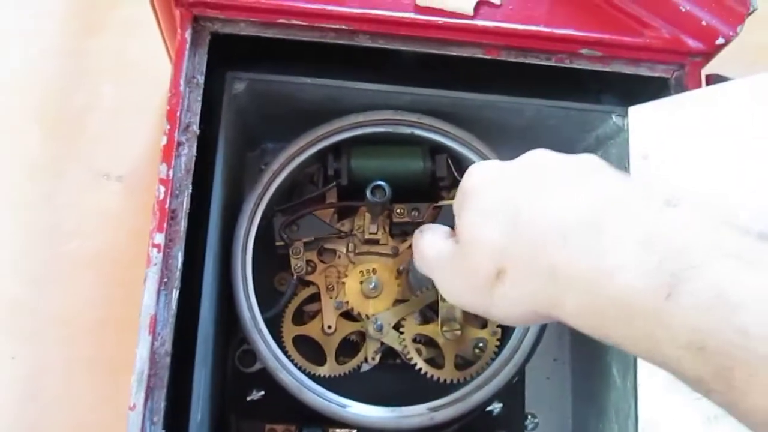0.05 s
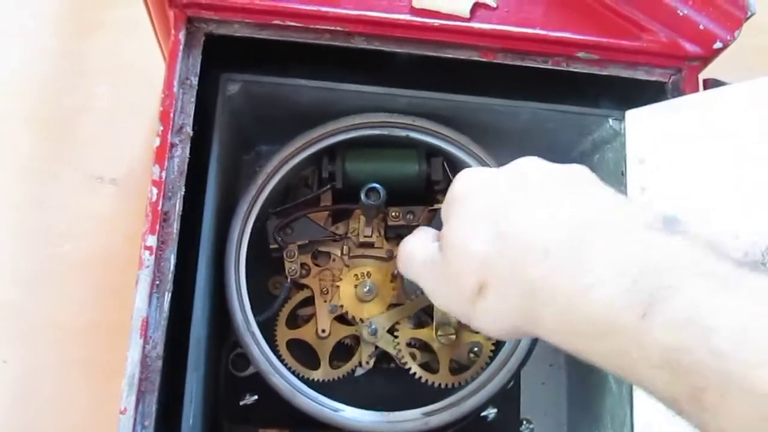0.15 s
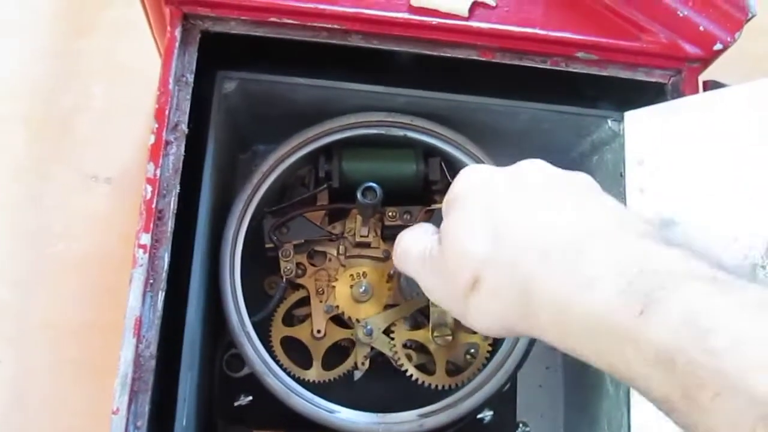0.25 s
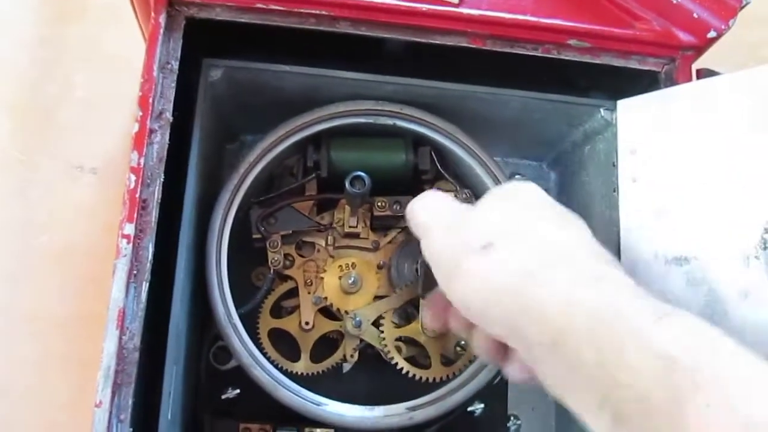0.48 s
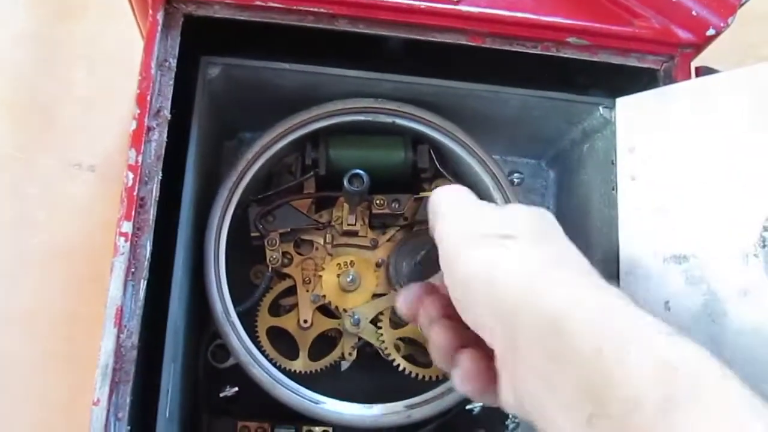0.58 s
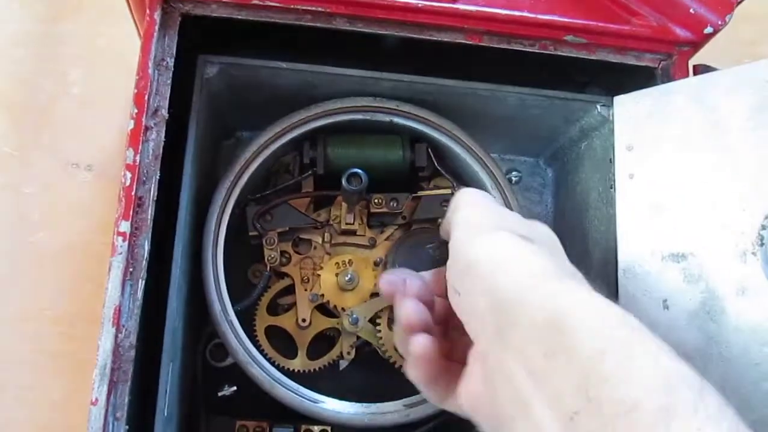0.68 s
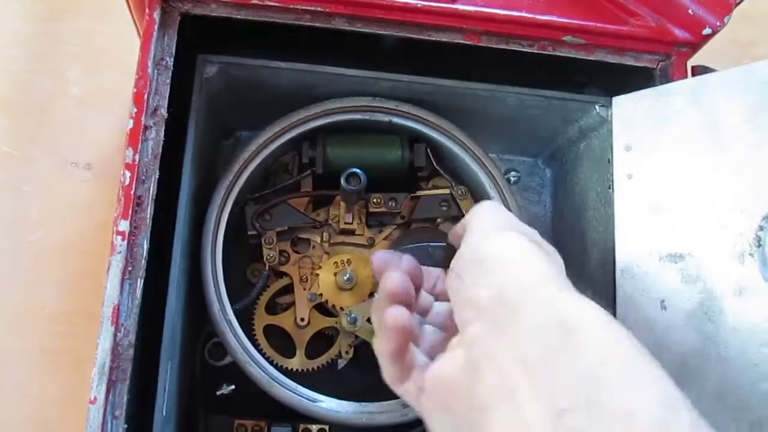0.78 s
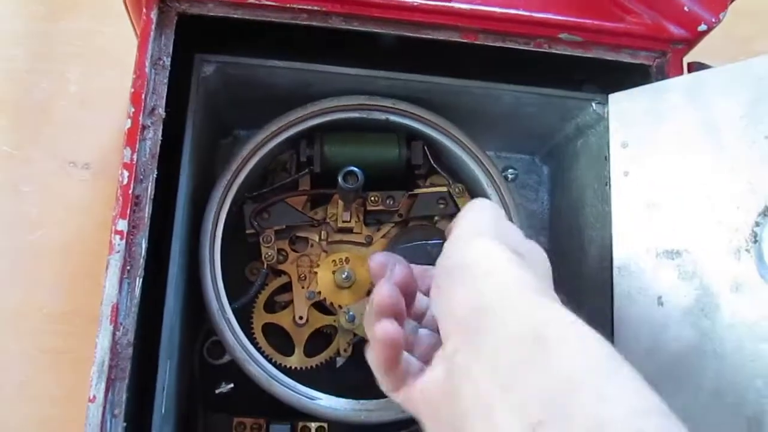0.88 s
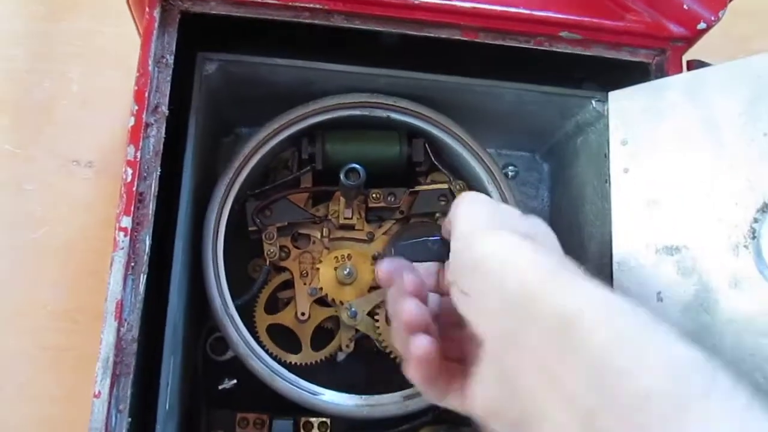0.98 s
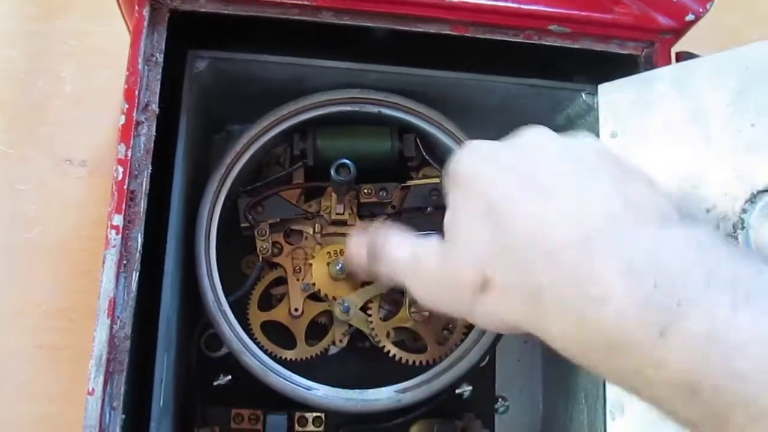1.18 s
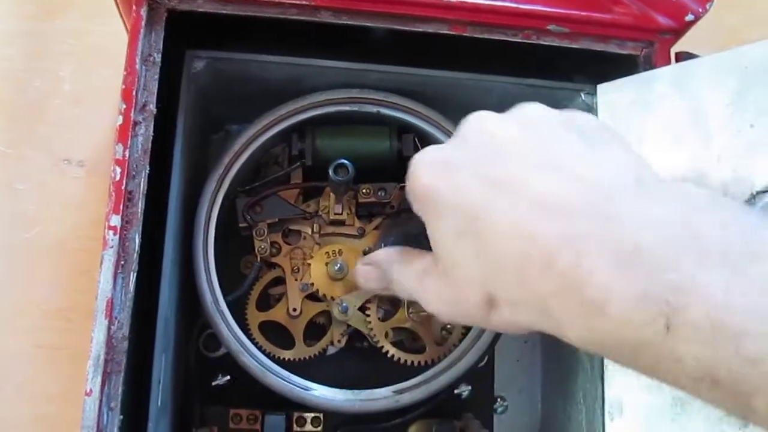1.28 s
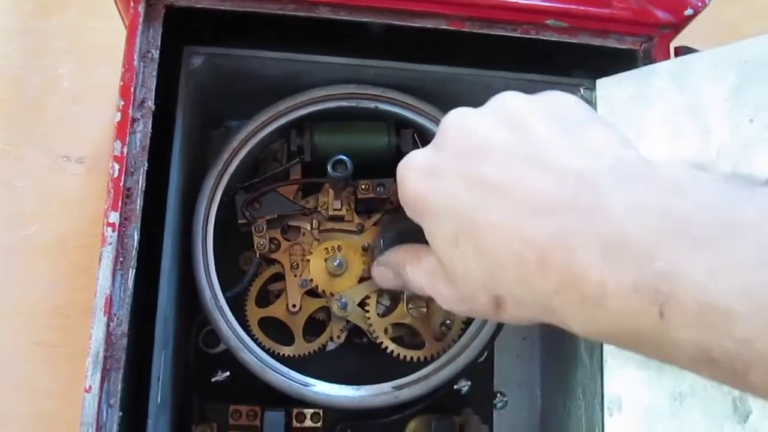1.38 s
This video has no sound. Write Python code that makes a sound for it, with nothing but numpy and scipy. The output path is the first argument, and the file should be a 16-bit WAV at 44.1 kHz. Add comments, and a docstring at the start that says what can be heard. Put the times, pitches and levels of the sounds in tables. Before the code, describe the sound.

A clockwork mechanism is wound by hand, close up in a small room. The key knocks, ten quick sharp ratchet clicks follow, then the key rattles, a steel part rings faintly and the metal case settles with dull bumps.

```python
"""A small room, a stereo microphone close to a clockwork movement in a metal case, wound by hand.
The key takes up its slack, the pawl snaps over ten ratchet teeth, then the spring falls back on it.
The key rattles as the hand lets go, a small steel part rings on and the box settles with dull bumps.
Each blow is a burst of noise plus the dying modes of the parts it strikes.
Behind it are the room's short reverberation, soft air and a faint hum."""
import sys
import numpy as np
from scipy import signal
from scipy.fft import rfft, irfft
from scipy.io import wavfile
from scipy.ndimage import uniform_filter1d

SR = 44100
rng = np.random.default_rng(int(sys.argv[2]) if len(sys.argv) > 2 else 0)


def file_out(sig):
    """Save sig as 16-bit WAV at sys.argv[1]."""
    # one column per channel
    cols = np.atleast_2d(sig).T
    # limit, then scale
    lim = np.clip(cols, -1, 1)
    pcm = np.round(lim * 32767).astype(np.int16)
    wavfile.write(sys.argv[1], SR, pcm)


N = 63945
T = np.arange(N) / SR
HZ = np.fft.rfftfreq(N, 1 / SR)
# At the microphone: left-right likeness of close noise, lag of the right side, lean to the left
NEAR_ALIKE, RIGHT_LAG_S, BODY_PAN_DB = 0.81, 0.000016, 1
STEEL_RISE_S = 0.00023


def amp(db):
    """Decibels to gain."""
    return 10 ** (np.asarray(db) / 20)


def unit(x):
    """Scales to rms 1."""
    return x / np.sqrt(np.mean(x ** 2) + 1e-20)


def read(points, hz):
    """Reads a table on a log-frequency axis."""
    f, value = np.transpose(points)
    return np.interp(np.log(hz + 1), np.log(f), value)


def pan(db):
    """Left and right gains, the left louder by db."""
    return amp([[db / 2], [-db / 2]])


def add(mix, s, sound):
    """Mixes a sound in at s seconds."""
    part = mix[:, round(s * SR):]
    part += sound[..., :part.shape[1]]


def strike(rise_s, t60_s):
    """Envelope of a blow: quick rise, exponential decay."""
    return (1 - np.exp(-T / rise_s)) * np.exp(-np.minimum(np.log(1000) * T / t60_s, 100))


def blend(a, b, alike):
    """Mixes two noises so that the result has a given likeness (0-1) to a."""
    alike = np.clip(alike, 0, 1)
    return alike * a + np.sqrt(1 - alike ** 2) * b


def noise(colour, alike, tilt_db=0, draws=2):
    """Stereo noise at rms 1 from the first two draws, with a colour, likeness and tilt per octave."""
    a, b = rfft(rng.standard_normal((draws, N))[:2])
    gain = amp(read(colour, HZ) + tilt_db * np.log2(np.maximum(HZ, 200)))
    return unit(irfft(np.array([a, blend(a, b, alike)]) * gain, N))


def mode(hz, db, t60_s, rise_s, detune=0):
    """One dying mode; the contact point shifts its pitch a little."""
    hz = hz * (1 + detune * rng.standard_normal())
    arrival = T - RIGHT_LAG_S * np.arange(2)[:, None]
    return amp(db) * strike(rise_s, t60_s) * np.sin(2 * np.pi * (hz * arrival + rng.random()))


def ring(modes, rise_s, detune=0.004):
    """All modes of one struck part."""
    return sum(mode(hz, db, t60, rise_s, detune) for hz, db, t60 in modes)


# Colour of the air in the room: f/Hz, relative level/dB
AIR_COLOUR = [(15, -62), (25, -39), (44, -11), (82, -19), (301, -9), (416, -5.5), (607, -10.5), (840, -5.5),
              (936, -12), (1230, -8.5), (1400, -11.5), (2840, -17.5), (8140, -33), (11300, -44.5),
              (16000, -61)]
# The air across the microphone: f/Hz, left-right likeness/0-1
AIR_ALIKE = [(40, 0.48), (200, 0.91), (800, 0.91), (2500, 0.17), (8000, 0.1)]
# Tones of the background hum: f/Hz, relative level/dB
HUM_TONES = [(59.2, -71), (376.8, -62.5), (414.5, -59.5), (559.9, -61), (845.2, -63.5)]
def room_tone(air_db=-49, hum_db=-1, waver_rad=0.26):
    """All around the microphone: soft steady air with a faint wavering hum."""
    hum = 0
    for hz, db in HUM_TONES:
        drift = unit(irfft(rfft(rng.standard_normal(N)) * np.exp(-HZ / 6), N))
        hum += amp(db + hum_db) * np.sqrt(2) * np.sin(2 * np.pi * hz * T + waver_rad * drift)
    air = amp(air_db) * noise(AIR_COLOUR, read(AIR_ALIKE, HZ))
    return pan(db=1.4) * (air + hum)


# Colour of the loose parts' clatter: f/Hz, relative level/dB
CLATTER_COLOUR = [(130, -55), (300, 0.5), (700, 13.5), (1200, 7), (2300, 6), (3300, -3.5), (5000, -7),
                  (6900, -9.5), (7800, -21), (9400, -16.5), (12000, -32), (15000, -55)]
# Modes of the case, the key on its arbor and the gear train: f/Hz, relative level/dB, t60/s
CASE_MODES = [(205, -38, .1), (325, -31, .1), (490, -31, .07), (646, -21, .07), (861, -18, .065),
              (1255, -24, .06), (1715, -22, .06)]
KEY_MODES = [(1428, -24, .085), (1562, -23, .09), (1700, -36, .05), (1890, -34, .14), (4480, -31, .06)]
GEAR_MODES = [(2190, -29, .1), (2345, -28, .07), (4120, -36, .08), (4790, -40, .08), (6810, -38, .07),
              (9350, -36, .06)]
# Knocks of key and spring: t/s, clatter level/dB, tilt/dB per octave, case, key and gear gains/dB
KNOCK_HITS = [(.2032, -30.5, -0.5, -14.5, -34, -18), (.2145, -31.5, 1.5, -43, -15.5, -14),
              (0.2272, -26.5, 5, -21.5, -18, -23), (.2640, -17.5, 6, -4.5, -0.5, -26),
              (.9195, -25, 3, -2, -34, -3), (0.9293, -12, 4.5, 1.5, 0, -16),
              (.9520, -29, 6.5, -80, -8, -16), (0.964, -27, -2, -10.5, -9, -12),
              (0.9765, -16, 8.7, -50, -11, 4.5), (1.0000, -18.5, 7.5, -27, -48, -8)]
def knocks(rise_s=0.0012):
    """Close up, before and after the winding: loose parts clatter and ring case, key and gears."""
    out = np.zeros((2, N))
    for s, db, tilt_db, case_db, key_db, gears_db in KNOCK_HITS:
        contact = noise(CLATTER_COLOUR, NEAR_ALIKE, tilt_db, draws=3)
        clatter = amp(db) * contact * strike(rise_s, t60_s=0.061)
        case = amp(case_db) * ring(CASE_MODES, rise_s=0.0023)
        key = amp(key_db) * ring(KEY_MODES, rise_s)
        gears = amp(gears_db) * ring(GEAR_MODES, rise_s)
        add(out, s, pan(db=2.5) * clatter + pan(BODY_PAN_DB) * (case + key + gears))
    return out


# Decay of the small room: f/Hz, t60/s
ROOM_DECAY = [(200, 0.34), (800, 0.48), (2500, 0.4), (6500, 0.4), (14000, 0.23)]
# Reflections across the microphone: f/Hz, left-right likeness/0-1
ECHO_ALIKE = [(250, 0.97), (700, 0.99), (1500, 0.88), (4000, 0)]
# Colour of the reflections: f/Hz, gain/dB
ECHO_COLOUR = [(100, -17), (190, 15), (300, 1.5), (700, 4), (1500, 3.5), (2500, 0), (5000, 2), (6700, -5.5),
               (9000, -3.5), (13000, -2.5)]
def reflections(direct, early_db=-15.5, tail_db=-8.5, tail_rise_s=0.0069):
    """Behind the direct sound: quick reflections from the case and the longer tail of the room."""
    a, b, c, d = rfft(rng.standard_normal((4, N)))
    alike = read(ECHO_ALIKE, HZ)
    early = irfft([a, blend(a, b, alike)], N) * strike(rise_s=0.021, t60_s=0.12)
    hz, t, bands = signal.stft(irfft([c, blend(c, d, alike)], N), SR, nperseg=256)
    bands *= np.exp(-np.log(1000) * t / read(ROOM_DECAY, hz)[:, None])
    tail = signal.istft(bands, SR)[1][:, :N] * np.minimum(T / tail_rise_s, 1) ** 2
    early *= amp(early_db) / np.linalg.norm(early[0])
    tail *= amp(tail_db) / np.linalg.norm(tail[0])
    coloured = irfft(rfft(direct) * amp(read(ECHO_COLOUR, HZ)), N)
    return signal.fftconvolve(coloured, early + tail, axes=1)[:, :N]


# Thin modes of a small steel part: f/Hz, relative level/dB, t60 when free/s
STEEL_MODES = [(11047, 0, 1.6), (11902, -19, 1.6)]
# Pings of that part: t/s, relative level/dB
PING_HITS = [(0.23, -56), (0.262, -41), (1.002, -42)]
def steel_pings(let_go_s=0.78, held_t60_ratio=0.12):
    """A little left: a steel part rings, briefly while the hand holds the key, freely once it lets go."""
    out = np.zeros((2, N))
    attack_boost = 1 + 1.44 * np.exp(-T / 0.037)
    for s, db in PING_HITS:
        t60_ratio = held_t60_ratio if s < let_go_s else 1
        tone = sum(mode(hz, db + mode_db, t60 * t60_ratio, STEEL_RISE_S)
                   for hz, mode_db, t60 in STEEL_MODES)
        add(out, s, tone * attack_boost)
    return pan(db=3) * out


# Colour of the pawl's snap: f/Hz, relative level/dB
SNAP_COLOUR = [(200, -66), (700, 6.5), (1800, -3), (2600, -2), (4500, 2.5), (7100, 1), (7800, -3),
               (8400, 2.5), (11500, -1.5), (13200, -16), (15500, -9)]
# Modes of the pawl: f/Hz, relative level/dB, t60/s, left over right/dB
PAWL_MODES = [(3270, -73, 0.033, 2), (3630, -41, 0.051, 20), (4420, -24.5, 0.011, 9),
              (5177, -19, 0.026, 3.5), (5500, -59, .025, -2), (6637, -12.5, 0.017, 13),
              (6890, -14, 0.018, -3.5), (9120, -20.5, 0.0089, 15), (10080, -10, 0.006, 1.5),
              (11960, -14, 0.0081, 2), (14850, -26.5, 0.033, -10.5)]
# Modes of the ratchet wheel and of the plate carrying the pawl: f/Hz, relative level/dB, t60/s
WHEEL_MODES = [(2328, -19, 0.015), (2516, -17.5, 0.024), (2910, -35.5, 0.16)]
PLATE_MODES = [(205, -52, .1), (330, -50, .06), (590, -39, .035), (672, -26, .05), (890, -35, .045),
               (1061, -38, .035), (1258, -39, .035)]
# One click a tooth: t/s, relative level/dB, tilt/dB per octave, plate gain/dB, wheel gain/dB
TOOTH_CLICKS = [(.3484, 0.5, -1, 4.5, -4), (.4229, -0.5, -1, 0.5, -1.5), (0.4743, -1, -1, 4.5, 1),
                (0.5222, -2.5, -0.5, 0.5, 0.5), (.5670, -2, 0, 0.5, -5), (0.615, -2.5, -1, 1.5, -2),
                (0.6666, -2.5, 0.5, -1, 0), (.7150, -2.5, -0.5, 6.5, -4.5), (0.7703, -2.5, 0, 3, 1.5),
                (0.8224, -3, -0.5, 4, -1.5)]
def ratchet(snap_db=-11.5, detune=0.0052):
    """Close up: each tooth drops the same pawl with a bright snap that rings pawl, wheel and plate."""
    out = np.zeros((2, N))
    shared_noise = noise(SNAP_COLOUR, NEAR_ALIKE)
    octaves = np.log2(np.maximum(HZ, 500) / 5000)  # the tilt pivots at 5 kHz
    wheel = pan(db=-4) * ring(WHEEL_MODES, STEEL_RISE_S, detune)
    for s, db, tilt_db, plate_db, wheel_db in TOOTH_CLICKS:
        contact = blend(shared_noise, noise(SNAP_COLOUR, NEAR_ALIKE, draws=3), alike=0.88)
        snap = amp(snap_db) * pan(db=2.5) * contact * strike(rise_s=0.00075, t60_s=0.027)
        pawl = sum(pan(pan_db) * mode(hz, mode_db, t60, STEEL_RISE_S, detune)
                   for hz, mode_db, t60, pan_db in PAWL_MODES)
        click = irfft(rfft(snap + pawl) * amp(tilt_db * octaves), N)
        plate = amp(plate_db) * pan(BODY_PAN_DB) * ring(PLATE_MODES, rise_s=0.0014, detune=0.012)
        add(out, s, amp(db) * (click + plate + amp(wheel_db) * wheel))
    return out


# Colour of the soft thud under each bump: f/Hz, relative level/dB
THUD_COLOUR = [(40, -16), (120, -17), (230, -3), (330, -1), (700, 0), (1500, -26), (5000, -72)]
# Modes of the box: f/Hz, relative level/dB, t60/s
BOX_MODES = [(190, -41, .07), (236, -27, .085), (440, -40, .05), (560, -42, .06), (700, -35, .07)]
# Bumps after the hand lets go: t/s, relative level/dB, pitch/ratio
BUMP_HITS = [(1.026, 1.5, 1), (1.065, -11, 0.99), (1.098, -15.5, 0.56), (1.137, -16.5, 1)]
def box_bumps(thud_db=-32, rise_s=0.005):
    """Near the centre: the box settles with a few soft, low thuds."""
    out = np.zeros((2, N))
    for s, db, pitch in BUMP_HITS:
        thud = amp(thud_db) * noise(THUD_COLOUR, alike=1) * strike(rise_s, t60_s=0.079)
        box = sum(mode(hz * pitch, mode_db, t60, rise_s) for hz, mode_db, t60 in BOX_MODES)
        add(out, s, amp(db) * pan(BODY_PAN_DB) * (box + thud))
    return out


def scene():
    """The clockwork from close by; its room echo varies slightly from click to click."""
    clockwork = ratchet() + knocks() + box_bumps()
    fade_phase = 2 * np.pi * 3.294 * T
    # three sets of reflections crossfade at constant total power
    fades = [np.sqrt(2 / 3) * np.cos(fade_phase + k * np.pi / 3) for k in range(3)]
    echoes = sum(reflections(clockwork * fade) for fade in fades)
    return clockwork + echoes + steel_pings() + room_tone()


def record(dry):
    """The microphone feeds a recorder whose band ends at 15.9 kHz."""
    lowpass = signal.firwin(255, 15900, window=("kaiser", 8), fs=SR)
    return signal.oaconvolve(dry, lowpass[None], "same")


dry = scene()
out = record(dry)
file_out(out)
```